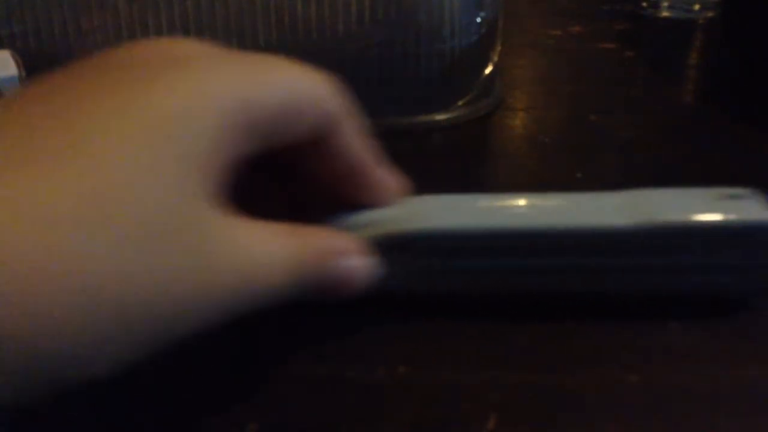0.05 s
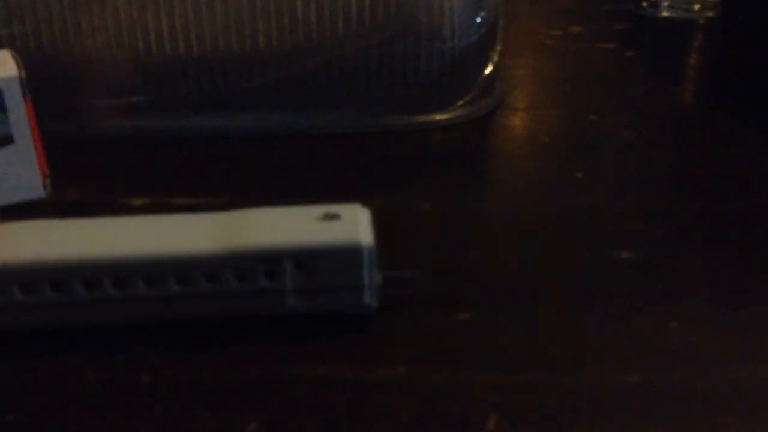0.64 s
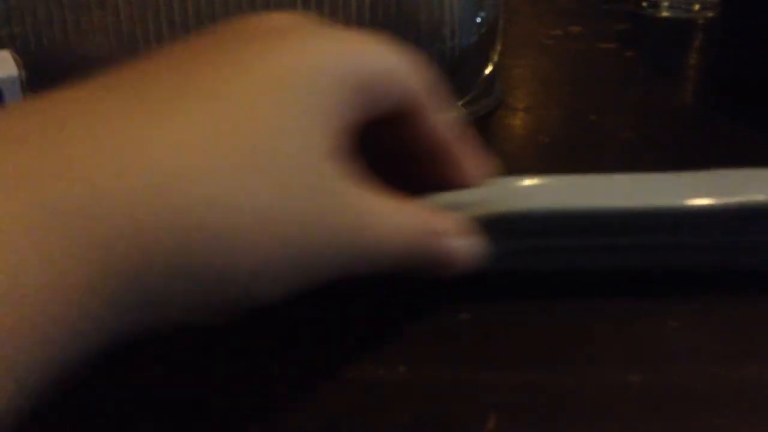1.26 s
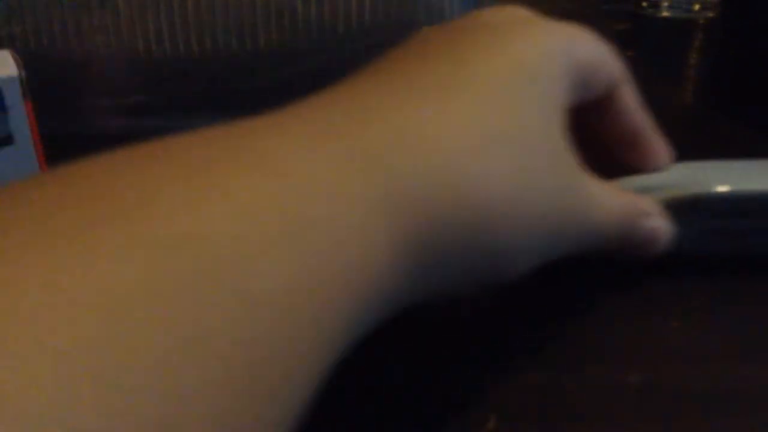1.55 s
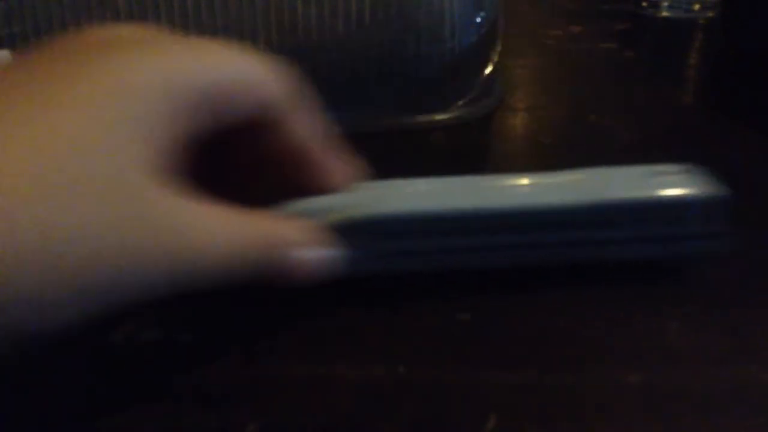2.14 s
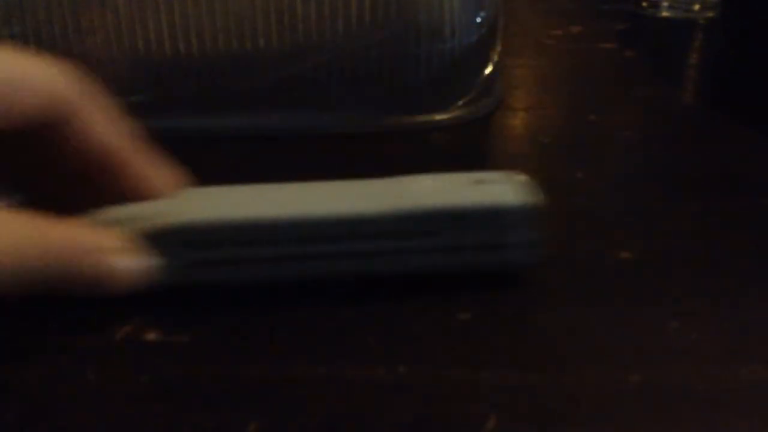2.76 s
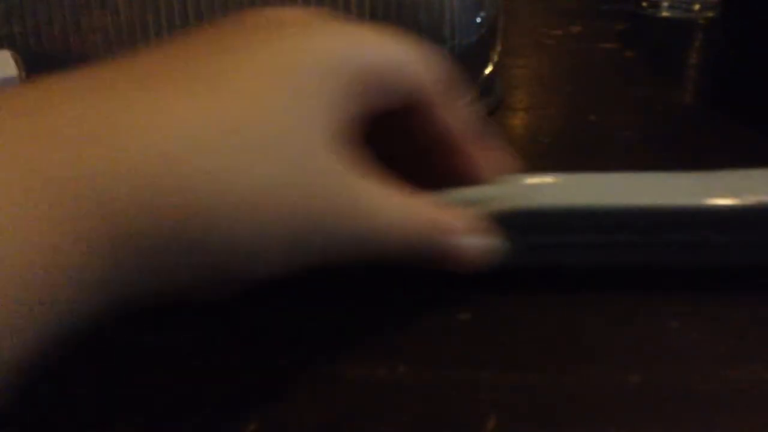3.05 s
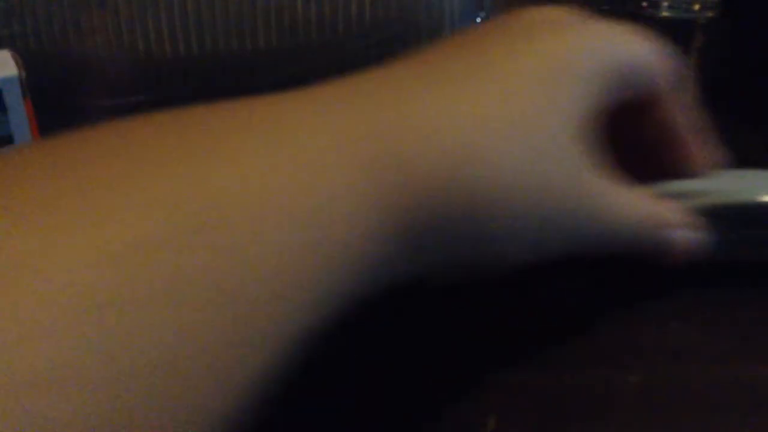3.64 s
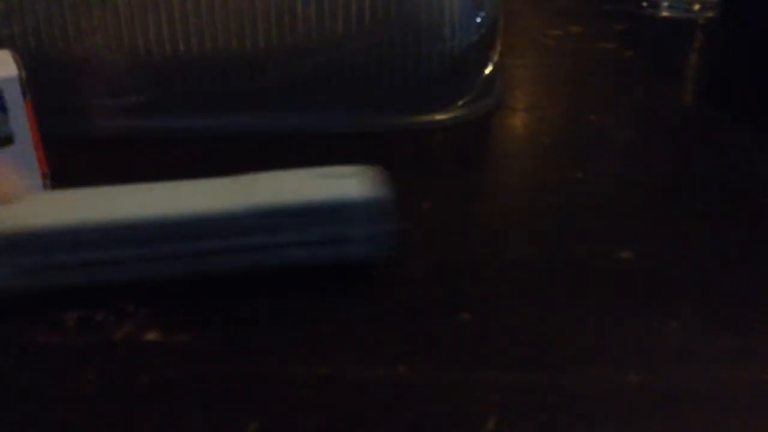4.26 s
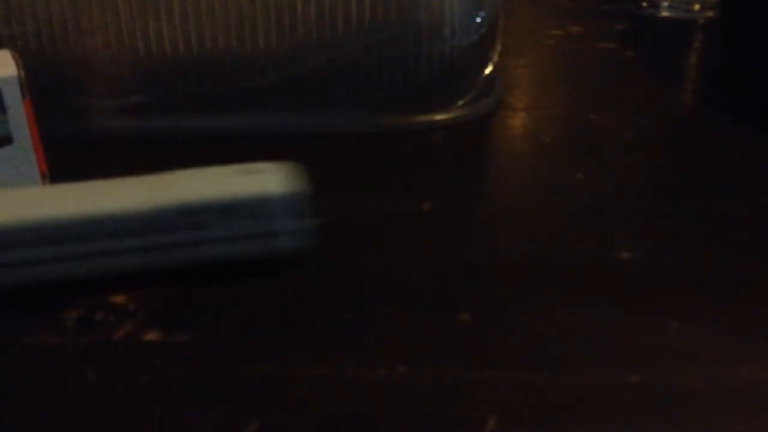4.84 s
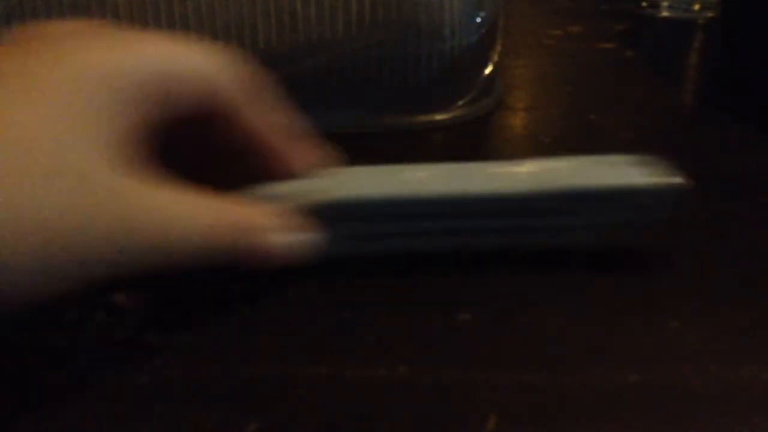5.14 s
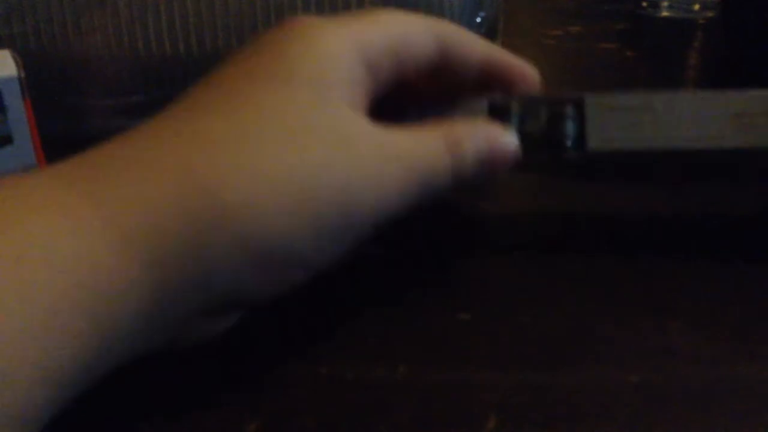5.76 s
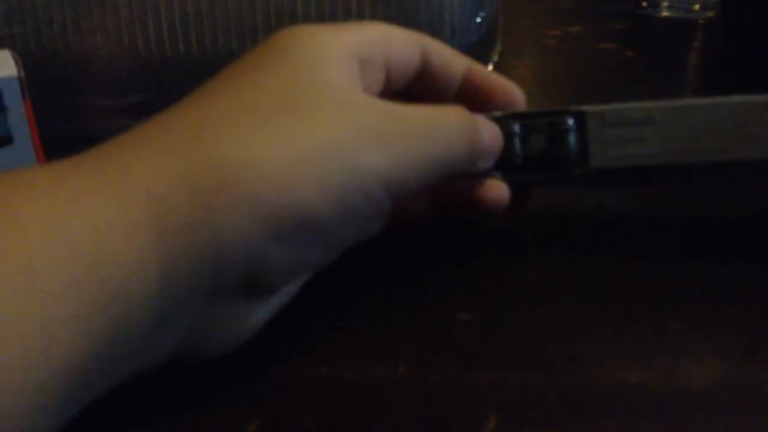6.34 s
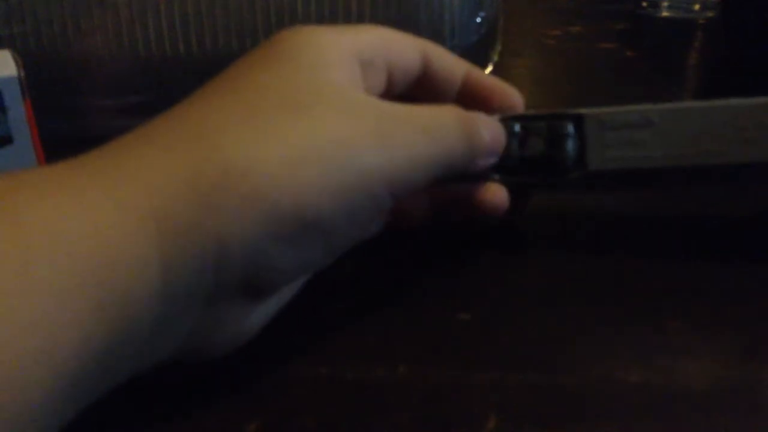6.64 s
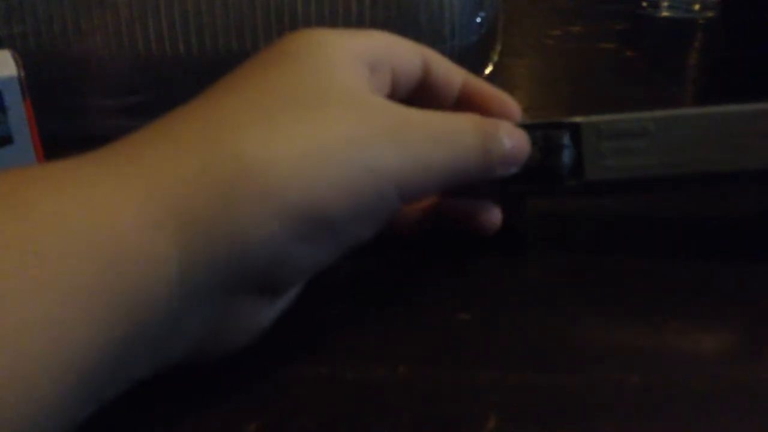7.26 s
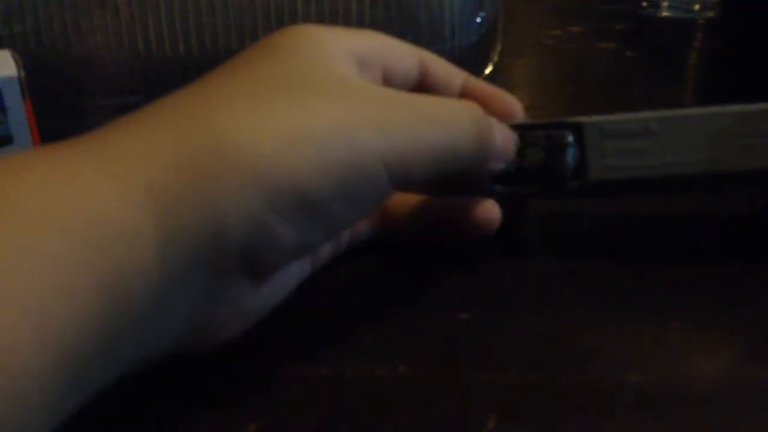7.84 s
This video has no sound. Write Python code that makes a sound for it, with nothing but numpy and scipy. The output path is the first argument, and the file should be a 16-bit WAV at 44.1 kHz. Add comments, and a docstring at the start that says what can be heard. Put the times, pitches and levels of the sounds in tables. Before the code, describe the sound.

In a small, quiet room with a faint hum, plastic wheels rumble and whir across a wooden tabletop, heard up close. A toy train is pulled back with tiny ticks and pushed forward with a bright axle rattle, three times over. A dry clack follows as it lands on its side, then a few light plastic clicks and soft swishes as it is handled.

```python
"""A small plastic toy train, rolled by hand three times back and forth on a wooden table, close to the
microphone. Its wheels drum on the wood and grind in their bearings; on each push the loose axles rattle,
on each pull the wheels tick over grit. Then it is tipped over with a knock, and its hollow shell clicks
lightly as it is handled, among faint, soft swishes. Behind it lies a small, quiet room with a faint hum."""
import sys
import numpy as np
from scipy import signal
from scipy.io import wavfile
from scipy.ndimage import uniform_filter1d

SR = 44100
rng = np.random.default_rng(int(sys.argv[2]) if len(sys.argv) > 2 else 0)


def materialize(psi):
    """Save the field psi as 16-bit PCM at rate SR to the path in sys.argv[1].

    A 1-D psi becomes a single channel; in a 2-D psi each row is a channel.
    """
    bounded = np.clip(np.atleast_2d(psi).T, -1, 1)
    quanta = np.round(bounded * 32767).astype(np.int16)
    wavfile.write(sys.argv[1], SR, quanta)


N = 356769


def amp(db):
    """Decibels to gain."""
    return 10 ** (np.asarray(db) / 20)


def unit(x):
    """Scales to an rms of one."""
    return x / np.sqrt(np.mean(x ** 2) + 1e-20)


def read(points, hz):
    """Reads a table along a log-frequency axis."""
    point_hz, value = np.transpose(points)
    return np.interp(np.log(hz + 1), np.log(point_hz), value)


def add(mix, start_s, sound):
    """Mixes a sound in at start_s."""
    part = mix[round(start_s * SR):][:len(sound)]
    part += sound[:len(part)]


def highpass(x, hz, order):
    """Rolls off the bass below hz."""
    return signal.sosfilt(signal.butter(order, hz, "high", fs=SR, output="sos"), x)


def colour(x, spectrum, size=4096):
    """Causal filter through points of (frequency_hz, gain_db)."""
    log_gain = np.log(amp(read(spectrum, abs(np.fft.fftfreq(size, 1 / SR)))))
    taps = np.fft.ifft(np.exp(np.conj(signal.hilbert(log_gain)))).real
    return signal.oaconvolve(x, taps[:size // 2])[:len(x)]


def resonate(x, resonances):
    """A body's resonances (pitch_hz, width_hz, gain_db); neighbours swing in opposite sense."""
    return sum((-1) ** k * amp(db) * signal.lfilter(*signal.iirpeak(hz, hz / width, SR), x)
               for k, (hz, width, db) in enumerate(resonances))


def tilt(x, slope_db, pivot_hz=5000, top_hz=16000):
    """Brightens or dulls a sound by a slope in dB per octave."""
    slope = [(hz, slope_db * np.log2(hz / pivot_hz)) for hz in (pivot_hz / 4, pivot_hz, top_hz + 1)]
    return colour(x, slope, size=2048)


def wander(rate_hz):
    """A random drift of unit size."""
    knots = rng.standard_normal(N // 100)
    return unit(np.interp(np.arange(N) * rate_hz / SR, np.arange(len(knots)), knots))


def grains(per_s, spread_db, t60):
    """Tiny impacts of uneven size, each a short burst of noise."""
    size = amp(spread_db * np.minimum(rng.exponential(1, N), 4)) * (rng.random(N) < per_s / SR)
    power = signal.lfilter([1], [1, -amp(-120 / (t60 * SR))], size ** 2)
    return unit(np.sqrt(power) * rng.standard_normal(N))


def ring(modes, t, grip_detune=.018):
    """Modes struck once; the grip shifts them a little, and the point of contact sets their phases."""
    shift = 1 + grip_detune * rng.standard_normal(len(modes))
    ringing = sum(amp(db - 60 * t / t60) * np.sin(2 * np.pi * (hz * shift[k] * t + rng.random()))
                  for k, (hz, db, t60) in enumerate(modes))
    return ringing * np.minimum(t * SR / 10, 1)


def swell(middle_s, half_s):
    """A smooth rise and fall round a moment."""
    return np.cos(np.pi / 2 * np.clip((np.arange(N) / SR - middle_s) / half_s, -1, 1)) ** 2


# Room tone behind the table: frequency_hz, gain_db
ROOM_TONE = [(25, -8), (70, -38), (120, -2), (280, 0.5), (420, -2.5), (600, -6), (1050, -16), (2500, -18),
             (4200, -18.5), (7000, -23.5), (15000, -25)]

def room_tone():
    """Soft steady room noise with a faint wavering hum; a faint blurred tone swells once."""
    tone = amp(-58) * unit(resonate(rng.standard_normal(N), [(785, 30, 0)])) * swell(7.0, .09)
    hum = amp(-65.5) * unit(resonate(rng.standard_normal(N), [(294.4, 6.1, 0)]))
    return amp(-58) * unit(colour(rng.standard_normal(N), ROOM_TONE)) + hum + tone


# Decay of the small room around the microphone: frequency_hz, t60_s
ROOM_DECAY = [(150, 0.32), (500, 0.26), (2000, 0.21), (7000, 0.11), (15000, 0.22)]

def room_echo(x, delay_s=.008, size=256):
    """Reflections from nearby things and walls, each band dying at its own speed."""
    reflections = rng.standard_normal(SR // 2) * (rng.random(SR // 2) < 4000 / SR)
    hz, t, bands = signal.stft(reflections, SR, nperseg=size)
    tail = signal.istft(bands * amp(-60 * t / read(ROOM_DECAY, hz)[:, None]), SR, nperseg=size)[1]
    tail = np.r_[np.zeros(round(delay_s * SR)), tail / np.linalg.norm(tail)]
    return signal.fftconvolve(x, tail)[:N]


# Faint, soft swishes: middle_s, half_length_s, level_db, brightness_db_per_octave
SWISHES = [(5.392, 0.19, -54, -18), (5.575, 0.1, -45, 1), (5.813, 0.28, -50.5, 1.5), (6.263, 0.15, -53, -6),
           (6.618, 0.13, -60, -5), (7.238, 0.11, -55.5, -6.5)]

def swishes():
    """Fine-grained noise swells and fades in faint, soft swishes, each with its own brightness."""
    spectrum = [(200, -12), (900, -6), (2200, -4), (4200, 1.5), (7000, -1.5), (15000, 2.5)]
    noise = colour(grains(per_s=5100, spread_db=5, t60=0.063), spectrum)
    return sum(amp(db) * swell(middle_s, half_s) * unit(tilt(noise, bright_db))
               for middle_s, half_s, db, bright_db in SWISHES)


# Modes of the hollow plastic shell: pitch_hz, level_db, t60_s
SHELL_MODES = [(1414, 5, 0.034), (1620, 1, 0.021), (2250, 13, 0.034), (2670, 13.5, 0.025), (3740, 5, 0.02),
               (4370, 6.5, 0.024), (6740, 7, 0.024), (7920, 12, 0.011), (13700, 3, 0.02)]
# The shell handled near the microphone: start_s, level_db, brightness_db_per_octave
CLICKS = [(5.459, -19, 1.5), (5.475, -25, 3), (5.491, -30, 7), (5.5192, -25, 8.5), (5.612, -21, 3),
          (5.65, -32, -6.5), (5.725, -37.5, -1), (5.81, -40, -12), (5.897, -34.5, -4.5), (6.246, -21.5, -3),
          (6.25, -24.5, 0.5), (6.311, -37.5, -5), (6.5125, -28, -8.5), (6.5175, -13, 3.5),
          (6.5443, -33, -9), (6.579, -31, 1), (6.686, -35, -2), (6.8052, -37, -6), (6.8174, -32.5, -5.5)]

def shell_clicks(snap_t60=0.028, trim_db=-10.5):
    """Light plastic clicks ring the hollow shell; harder contacts are brighter."""
    t, out = np.arange(SR // 8) / SR, np.zeros(N)
    spectrum = [(100, -70), (800, -48), (1500, 12), (8000, 2.5), (15000, -3)]
    for start_s, db, bright_db in CLICKS:
        snap = colour(rng.standard_normal(len(t)) * amp(-60 * t / snap_t60), spectrum, size=1024)
        click = tilt(unit(ring(SHELL_MODES, t)) + amp(-1) * unit(snap), bright_db)
        add(out, start_s + 0.00048, amp(db + trim_db) * click / click[t < .003].std())
    return highpass(out, 700, order=2)  # so small a shell radiates no bass


# Modes of train and table knocking together: pitch_hz, level_db, t60_s
KNOCK_MODES = [(200, -9, 0.03), (349, -18, 0.17), (544, 2.5, 0.039), (533, -14, 0.24), (834, -1, 0.016),
               (1190, 1, 0.017), (1690, -9, 0.011), (3050, -17, 0.014)]

def tipping(start_s=5.458, level_db=-15, rise_s=0.0023, judder_db=-19, judder_t60=0.21):
    """The whole train lands on its side with a dry clack, then judders to rest on the table's low note."""
    t, out = np.arange(SR // 3) / SR, np.zeros(N)
    knock = ring(KNOCK_MODES, t) * np.minimum(t / rise_s, 1)
    table_note = [(544, 130, 0)]
    judder = unit(resonate(resonate(rng.standard_normal(len(t)), table_note), table_note))
    judder *= amp(judder_db - 60 * t / judder_t60)
    add(out, start_s, amp(level_db) * (knock / abs(knock).max() + judder))
    return highpass(out, 150, order=2)


# Resonances of the wooden top under the train: pitch_hz, width_hz, gain_db
TABLE_TOP = [(134.5, 12.7, -2), (166, 18, -1.5), (210.4, 14.6, 2.5), (273, 52, -4), (308.8, 23.4, 0),
             (351.8, 43.4, -3), (445, 270, -10.5), (548.7, 14.6, -8.5)]

def table_drum(force, low_hz, slope_db):
    """The table top drums, but radiates little deep bass."""
    drum = tilt(resonate(force, TABLE_TOP), slope_db, pivot_hz=510, top_hz=506)
    return highpass(drum, low_hz, order=4)


def thump(t, hz=275, t60=0.016, drum_db=-5):
    """A wheel drops on the table: one quick low bounce, then the top drums softly."""
    drum = table_drum(np.exp(-t / 0.0015), low_hz=212, slope_db=5.5)
    bounce = highpass(np.sin(2 * np.pi * hz * t) * amp(-60 * t / t60), 170, order=3)
    return bounce + amp(drum_db) * drum / abs(drum).max()


# Strokes along the table: start_s, fastest_s, stop_s, level_db, extra_rumble_db, pushed (0 is a pull)
STROKES = [(-.4, 0.45, 0.67, -4, 1.5, 0), (0.61, 1.092, 1.91, -4, -1.5, 1), (1.696, 2.25, 2.544, 0.5, 0, 0),
           (2.514, 2.932, 3.636, -0.5, -1, 1), (3.506, 4.09, 4.629, 2, 0, 0),
           (4.617, 5.046, 5.677, 2.5, -5, 1)]

def hand_motion(push_power=1.74, pull_power=0.77):
    """Each stroke is an arch of speed, rest to rest; a push gathers speed gradually, a pull at once."""
    t = np.arange(N) / SR
    arches = np.array([np.sin(np.interp(t, [start, fastest, stop], [0, np.pi / 2, np.pi]))
                       ** (push_power if push else pull_power)
                       for start, fastest, stop, *_, push in STROKES])
    start, _, stop, level_db, drum_db, push = np.array(STROKES)[arches.argmax(axis=0)].T
    level_db, drum_db, pushed = uniform_filter1d(np.array([level_db, drum_db, push]), size=2000)
    speed, progress = arches.max(axis=0), np.clip((t - start) / (stop - start), 0, 1)
    return speed, level_db, drum_db, pushed, progress


# Surfaces close by mirror the wheels to the microphone: drawn_back_delay_s, pushed_out_delay_s, gain_db
NEAR_SURFACES = [(0.00072, 0.0009, -13.5), (0.0021, 0.0028, -18)]

def near_reflections(x):
    """Close reflections comb the wheel noise; the comb slides as the train travels."""
    *_, pushed, progress = hand_motion()
    place = uniform_filter1d(pushed * progress + (1 - pushed) * (1 - progress), size=2000)
    n = np.arange(N)
    return x + sum(amp(db) * np.interp(n - SR * (back_s + (out_s - back_s) * place), n, x)
                   for back_s, out_s, db in NEAR_SURFACES)


# On a pull the axles stay seated and the wheels only tick over grit: start_s, level_db, pitch_hz
GRIT_TICKS = [(0.504, -43, 5000), (2.035, -36.5, 5830), (2.1126, -41, 6340), (2.2004, -41, 9000),
              (2.2188, -34.5, 7850), (2.3125, -33, 6740), (3.7248, -41.5, 7000), (3.7817, -38, 9700),
              (3.874, -39, 8300), (3.9062, -39, 6800), (3.9592, -28.5, 8600), (4.1147, -38, 7000),
              (4.169, -41, 8100), (4.1894, -32.5, 7300), (4.2072, -40, 7100), (4.3557, -35.5, 5500),
              (4.4709, -47, 13500), (4.478, -43, 7850)]

def grit_ticks(t60=0.018, width_share=0.27, splash_db=1):
    """A wheel snaps over a speck of grit: a tiny dry burst, each at its own pitch."""
    t, out = np.arange(SR // 32) / SR, np.zeros(N)
    for start_s, db, hz in GRIT_TICKS:
        burst = rng.choice([-1, 1], len(t)) * amp(-60 * t / t60)
        tick = unit(resonate(burst, [(hz, width_share * hz, 0)])) + amp(splash_db) * unit(burst)
        add(out, start_s, amp(db) * tick / tick[t < t60 / 2].std())
    return out


# Wheels and axles sing in a narrow band: middle_s, half_length_s, pitch_hz, glide_hz_per_s, level_db
WHIRRS = [(0.131, 0.27, 1820, -600, -45.5), (0.449, 0.15, 4980, -300, -50.5),
          (2.251, 0.17, 1726, -700, -43.5), (2.263, 0.12, 5380, -500, -44), (3.195, 0.28, 2660, 692, -49),
          (3.636, 0.047, 1377, -700, -45.5), (3.874, 0.34, 1934, -650, -40.5),
          (4.24, 0.39, 5360, -200, -48.5), (5.117, 0.21, 5490, 1497, -39.5)]

def whirrs(width_share=0.23, flutter_db=1.5):
    """Friction feeds one resonance of a wheel or axle, which glides as the train rolls on."""
    out = np.zeros(N)
    for middle_s, half_s, hz, glide, db in WHIRRS:
        t = np.arange(-half_s, half_s, 1 / SR)
        friction = (rng.standard_normal(SR) + 1j * rng.standard_normal(SR))[:len(t)]
        band = signal.lfilter(*signal.butter(2, width_share * hz / 2, fs=SR), friction)
        tone = unit((band * np.exp(2j * np.pi * np.cumsum(hz + glide * t) / SR)).real)
        flutter = amp(flutter_db * wander(rate_hz=46)[:len(t)])
        whirr = amp(db) * np.cos(np.pi / 2 * t / half_s) ** 2 * flutter * tone
        add(out, max(middle_s - half_s, 0), whirr[middle_s + t >= 0])
    return out


# Clack resonances of the chassis: pitch_hz, width_hz, gain_db
CHASSIS = [(5020, 460, 0.16), (6110, 620, 0.93), (7030, 770, 0.64), (8000, 680, 1.8)]
# Sizzle where axle meets slot: frequency_hz, gain_db
SIZZLE = [(300, 3.5), (1200, -10), (3500, 5), (8500, 4.5), (10500, 8.5), (12000, 3.5), (13300, 7.5),
          (14600, 13), (16000, 0)]
# Loose axles hit their slots, heard close: start_s, clack_db, ping_above_clack_db, sizzle_above_clack_db
AXLE_HITS = [(0.8064, -39.5, -1, -4), (0.8452, -39, -26, -1), (0.868, -33, -3.5, 0), (0.893, -32, -2, 1),
             (0.9045, -25.5, -1.5, 0), (0.947, -33, -5, -11), (0.9798, -30, -6, -1), (1.0094, -27.5, -7, 0),
             (1.0268, -33, -9, -6), (1.0484, -36, -11, -6), (1.076, -31.5, -2, 0), (1.1033, -29.5, -3, 8),
             (1.1383, -36, -2, -9), (1.1677, -34, 2.5, 4), (1.1954, -30, -1.5, 7.5),
             (1.2322, -38.5, -1, -1), (1.2617, -37, 2.5, 4), (1.2994, -32, -8, -10), (1.3072, -40, 6, 8),
             (1.33, -38.5, 3, 1), (1.364, -40, 5.5, 6), (1.4172, -30, 3, 1), (1.4407, -31.5, -1, 4.5),
             (1.485, -44, 11, 5), (1.5632, -32.5, 0.5, 2.5), (1.6097, -42, 3.5, 6),
             (2.6457, -32.5, -1.5, 8), (2.7414, -31, 0.5, 5.5), (2.7721, -33, 0.5, 6),
             (2.7907, -30.5, -10, -1), (2.8427, -30.5, 2, 6), (2.8685, -43, -8, 17), (2.8843, -29.5, -1, 2),
             (2.9249, -32.5, 4, 6.5), (2.9474, -38, -9, 1), (2.961, -29.5, -2, 1.5), (3.0004, -37, 3, 6),
             (3.038, -29.5, -4, 2.5), (3.0792, -43.5, 12, 12.5), (3.1203, -34, 6.5, 12.5),
             (3.1648, -44, 2, 0), (3.2084, -29, 2, 1.5), (3.2578, -37.5, 8, 7), (3.3061, -35.5, 8, -2),
             (3.371, -33.5, 4, 6), (4.695, -31.5, 6, 3.5), (4.739, -33.5, -3.5, 1), (4.8154, -34.5, -4, 6),
             (4.8439, -29.5, 0.5, 4), (4.8644, -40.5, 5, 7), (4.9145, -32.5, -1, -2),
             (4.9355, -25, -11, -1.5), (4.9516, -33, -11, 3), (5.0286, -33, 3, 7.5),
             (5.0732, -28.5, -15, 2), (5.093, -27, 1.5, 2), (5.106, -31.5, -4, 1), (5.1242, -35.5, -2, 7),
             (5.16, -44, 12.5, 11), (5.175, -35.5, 1, 4), (5.242, -40.5, 9.5, 10.5), (5.279, -34.5, -4, 1)]
# The first jolts of a push thump the table: start_s, level_db
JOLTS = [(0.768, -23), (0.805, -24.5), (2.646, -24)]

def axle_rattles(chatter_t60=0.013, rise_s=.0003, detune=0.029, thump_db=7):
    """An axle chatters in its slot: the chassis pings and clacks, the contact sizzles, the top thumps."""
    ping_hz, ping_width_hz, ping_climb = 2530, 166, 0.074  # the chassis' lowest ring climbs in a push
    t, out = np.arange(SR // 16) / SR, np.zeros(N)
    envelope = amp(-60 * (t / chatter_t60) ** 1.26) * np.minimum(t / rise_s, 1)
    *_, progress = hand_motion()
    for start_s, db, ping_db, sizzle_db in AXLE_HITS:
        chatter = rng.choice([-1, 1], len(t)) * envelope
        climb = 1 + ping_climb * progress[round(start_s * SR)] ** 2
        ping = resonate(chatter, [(ping_hz * climb, ping_width_hz, 0)])
        clack = resonate(chatter, [(hz * (1 + detune * rng.standard_normal()), width, gain_db)
                                   for hz, width, gain_db in CHASSIS])
        sizzle = colour(chatter, SIZZLE, size=1024)
        hit = sum(amp(part_db) * part / part[t < .007].std()
                  for part, part_db in [(clack, 0), (ping, ping_db), (sizzle, sizzle_db)])
        add(out, start_s, amp(db) * (hit + amp(thump_db) * thump(t)))
    for start_s, db in JOLTS:
        add(out, start_s, amp(db) * thump(t))
    return out


# Resonances of the hollow wheels and thin axles: pitch_hz, width_hz, gain_db
WHEELS = [(1389, 187, -6.5), (1828, 210, 4.5), (2270, 434, 2), (2748, 510, 0.5), (3750, 2400, -11.5)]
AXLES = [(5350, 1050, 7), (7230, 760, 5.5)]
# Broad wheel grind and axle hiss, close to the microphone: frequency_hz, gain_db
WHEEL_GRIND = [(300, -16), (600, -14.5), (950, -4), (1500, 2), (2500, -20), (3400, -13.5), (8000, -1.5),
               (15000, -23)]
AXLE_HISS = [(1500, -15), (3500, 5), (7500, -3.5), (10000, -1), (12500, 6), (14500, 5)]

def rolling(pressure_db=1.3):
    """Wheels run over the wood's grain; their uneven load shakes rumble, grinding and hiss together."""
    speed, stroke_db, drum_db, pushed, _ = hand_motion()
    effort_db = stroke_db + pressure_db * wander(rate_hz=12)  # the hand's pressure wavers
    load = wander(rate_hz=81)

    def drive(pull_db, push_db, doubling_db):
        """A rolling noise gains doubling_db with each doubling of speed."""
        direction_db = (1 - pushed) * pull_db + pushed * push_db
        return amp(effort_db + direction_db + doubling_db * np.log2(speed + 1e-9))

    # pulled, the train bears down and drums deeper; pushed, it skips
    bumps = grains(per_s=900, spread_db=3, t60=0.0043) * amp(0.29 * load)
    deep = unit(table_drum(bumps, low_hz=116, slope_db=-3.5))
    light = unit(table_drum(bumps, low_hz=142, slope_db=-1))
    rumble = amp(drum_db - 3) * ((1 - pushed) * deep + pushed * light)
    # grit rings the hollow wheels
    grit = grains(per_s=980, spread_db=2, t60=0.023) * amp(2.44 * load)
    grind = amp(-1.8) * unit(resonate(grit, WHEELS)) + amp(-10.5) * unit(colour(grit, WHEEL_GRIND))
    # the thin axles scuff in their slots, more smoothly when pulled
    scuffs = grains(per_s=900, spread_db=4, t60=0.011) * amp((2 + pushed) * load)
    hiss = amp(-8) * unit(resonate(scuffs, AXLES))
    hiss += amp(-5.5 + 2 * pushed) * unit(colour(scuffs, AXLE_HISS))
    return (rumble * drive(pull_db=-35, push_db=-28.5, doubling_db=7.4)
            + grind * drive(pull_db=-38, push_db=-34.5, doubling_db=9.2)
            + hiss * drive(pull_db=-40, push_db=-37, doubling_db=9.9))


def scene():
    """The train close up, the small room behind it; the sharp rattles and clicks are the driest."""
    air = room_tone()
    light_sounds = shell_clicks() + swishes()
    knock = tipping()
    clacks = axle_rattles() + grit_ticks()
    wheels = amp(-0.5) * near_reflections(rolling() + whirrs())
    send = amp(-11) * wheels + amp(-14.5) * clacks + amp(-13) * light_sounds + amp(-12.5) * knock
    return (wheels + clacks + light_sounds + knock + room_echo(send) + air)[None]


def record(dry, low_hz=85, top_hz=15280):
    """One small microphone by the table loses the deep bass; the recorder cuts the highest treble."""
    band_limit = signal.firwin(601, top_hz, window=("kaiser", 8), fs=SR)
    return signal.oaconvolve(highpass(dry, low_hz, order=1), band_limit[None], "same")


dry = scene()
out = record(dry)
materialize(out)
```